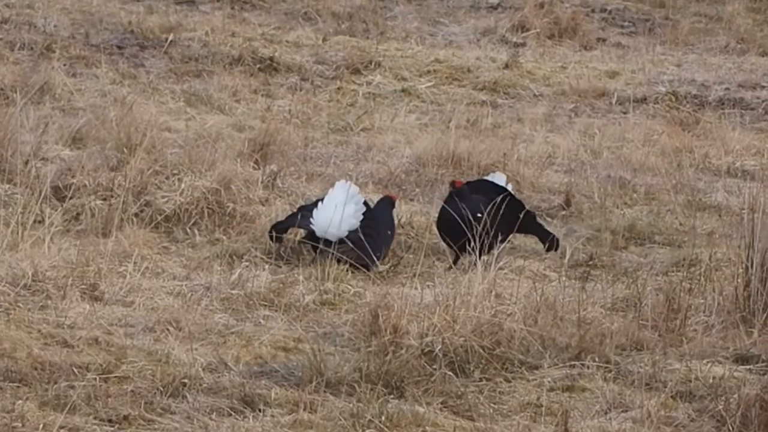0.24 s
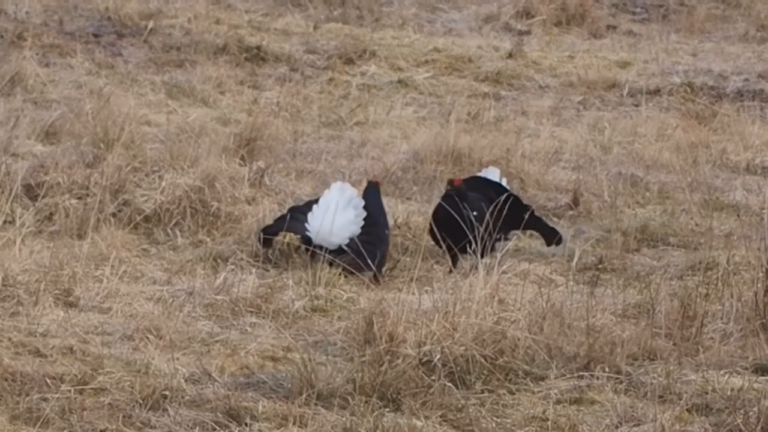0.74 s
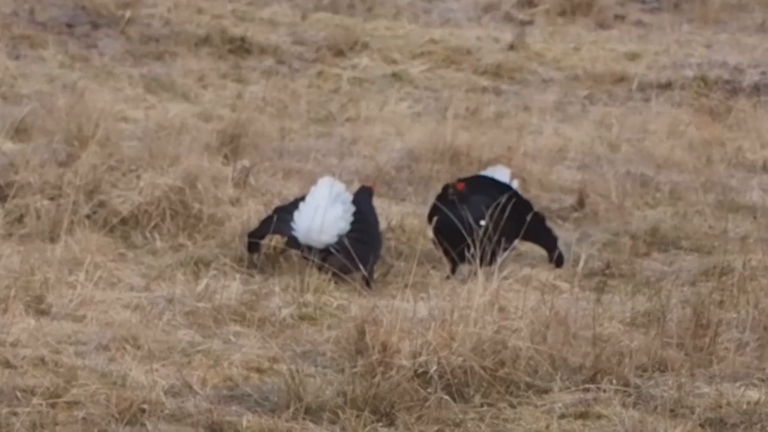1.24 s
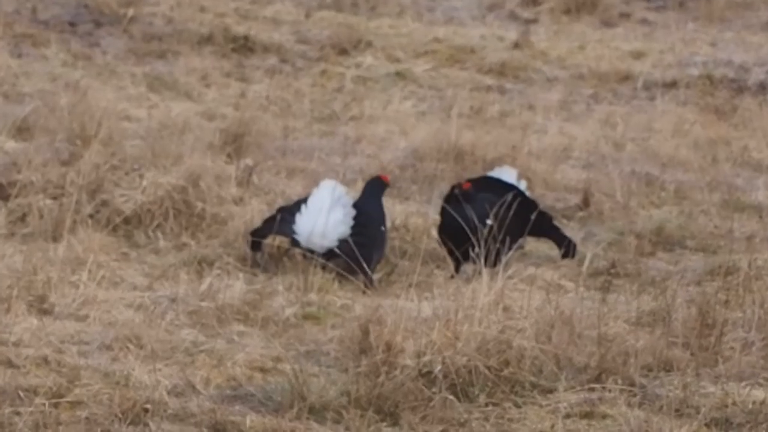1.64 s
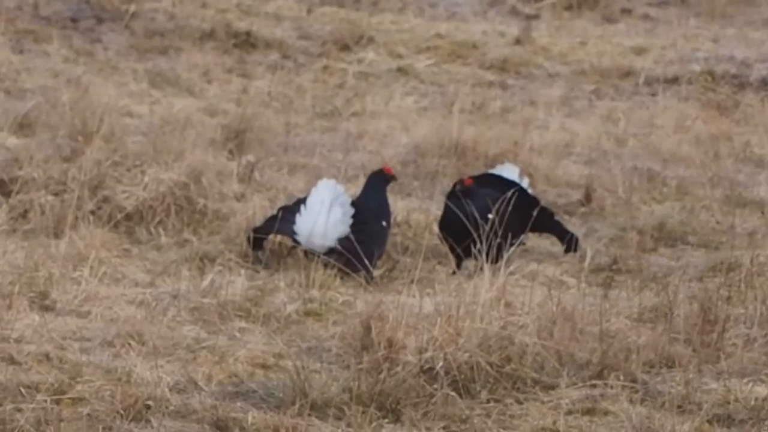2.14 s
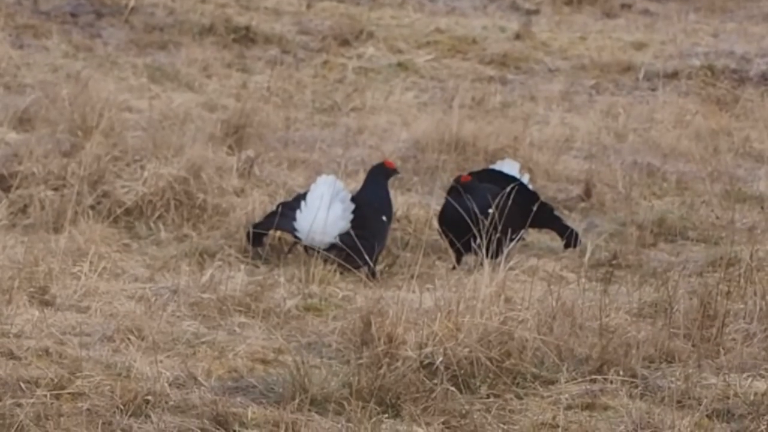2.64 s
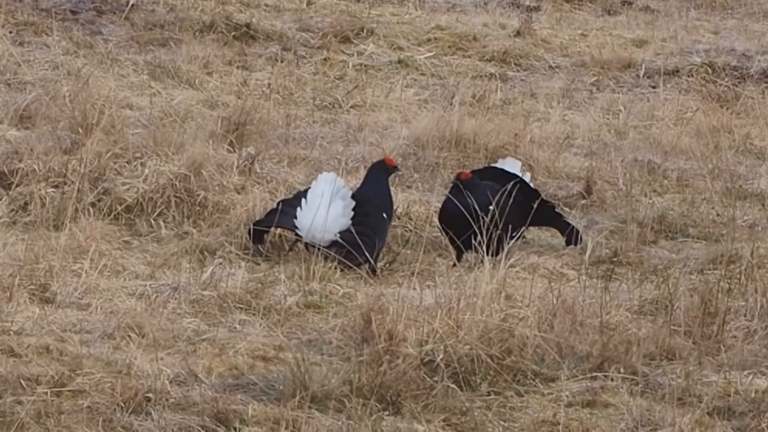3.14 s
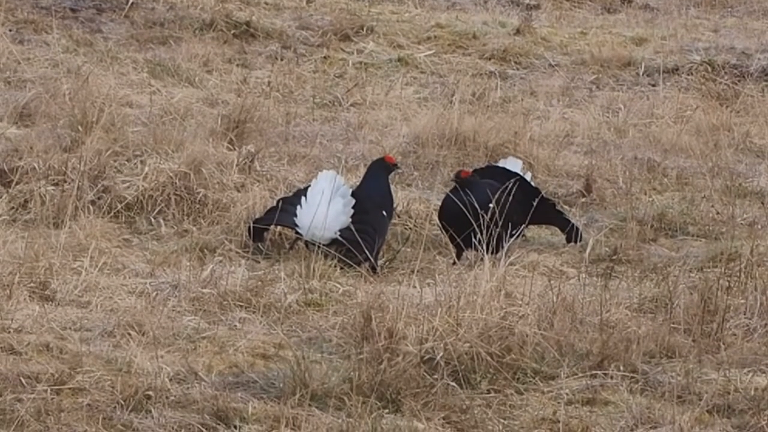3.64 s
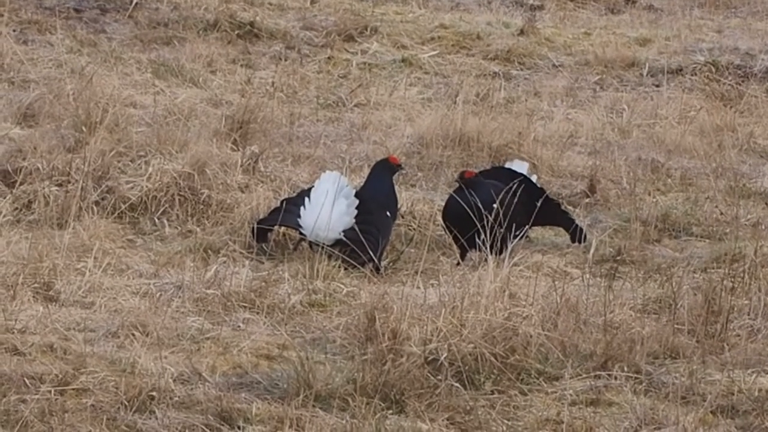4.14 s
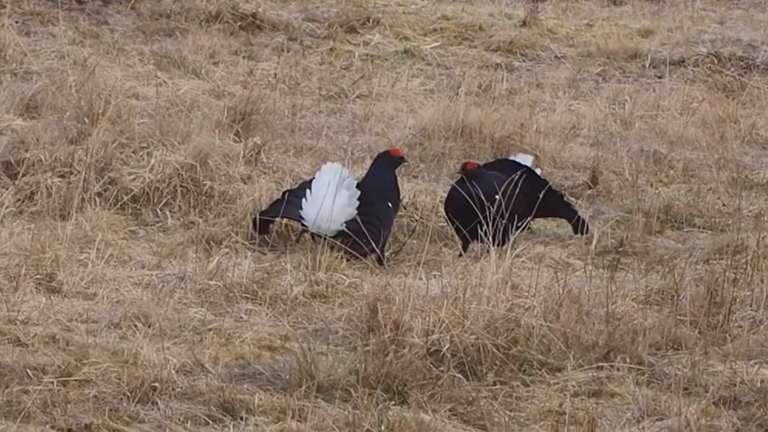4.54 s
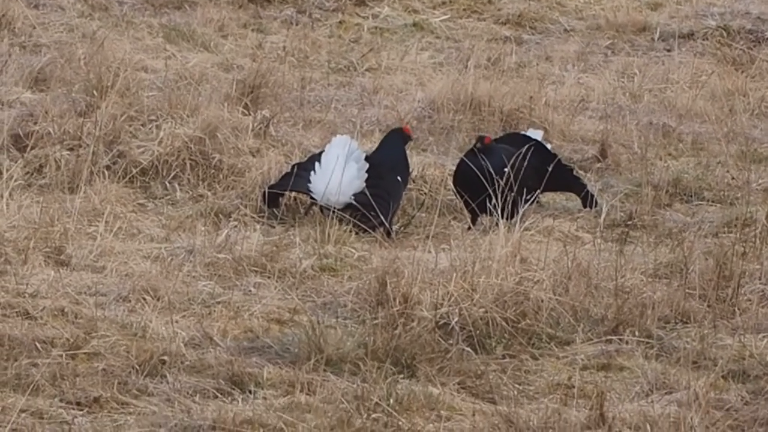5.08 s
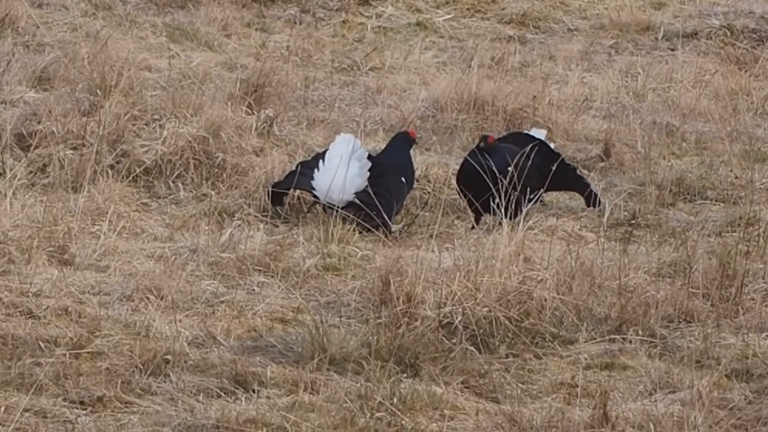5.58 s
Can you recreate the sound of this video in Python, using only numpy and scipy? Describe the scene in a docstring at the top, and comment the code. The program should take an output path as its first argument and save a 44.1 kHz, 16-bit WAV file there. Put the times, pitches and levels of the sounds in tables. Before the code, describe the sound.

Two black grouse bubble and coo low and liquid on an open moor, with an early hoarse cackle and light wind rumble.

```python
"""Black grouse display on an open moor

Males bubble and coo in light wind: each bubble is a ringing sine, each coo a gliding, nearly pure tone.
Behind them a distant chorus blends bands of noise around one pitch with many faint bubbles.
Early on, one male cackles: rows of partials shaped by a throat, with pulsing noise for the hiss.
Faint songbirds are short gliding sines; ticks in the grass are brief bursts of noise.
Two dull knocks near the microphone are dying low tones, each doubled and topped with a noisy snap."""
import sys
import numpy as np
from scipy import signal
from scipy.fft import rfft, irfft, next_fast_len
from scipy.io import wavfile

SR = 44100
rng = np.random.default_rng(int(sys.argv[2]) if len(sys.argv) > 2 else 0)


def file_out(sig):
    """Save sig as 16-bit WAV at sys.argv[1]."""
    # one column per channel
    cols = np.atleast_2d(sig).T
    # limit, then scale
    lim = np.clip(cols, -1, 1)
    pcm = np.round(lim * 32767).astype(np.int16)
    wavfile.write(sys.argv[1], SR, pcm)


N = 256220
TIME = np.arange(N) / SR  # seconds


def amp(db):
    """Turns decibels into gain."""
    return 10 ** (np.asarray(db) / 20)


def evened(x):
    """Scales a sound to an average (rms) strength of 1."""
    return x / np.sqrt(np.mean(x ** 2) + 1e-20)


def read(points, hz):
    """Reads a curve of (Hz, value) points, with frequency on a log axis as in hearing."""
    f, value = np.transpose(points)
    return np.interp(np.log(hz + 1), np.log(f + 1), value)


def level(rows):
    """Turns (s, dB) points into a gain at every sample."""
    return amp(np.interp(TIME, *np.transpose(rows)))


def colour(x, points):
    """Filters a sound by making each frequency louder or softer, from (Hz, dB) points."""
    n = x.shape[-1]
    size = next_fast_len(n + 4096)
    gain = amp(read(points, np.fft.rfftfreq(size, 1 / SR)))
    return irfft(rfft(x, size) * gain, size)[..., :n]


def noise(points, size=N):
    """Makes noise of rms 1 with a chosen balance of frequencies."""
    return evened(colour(rng.standard_normal(size), points))


def band(hz, width_hz, size=N):
    """Makes noise in one bell-shaped band; around zero Hz it is a slow random drift."""
    full = next_fast_len(max(size, SR // 4))
    f = np.fft.rfftfreq(full, 1 / SR)
    spectrum = rng.standard_normal((len(f), 2)) @ [1, 1j]
    bell = np.exp(-.5 * ((f - hz) / width_hz) ** 2)
    return evened(irfft(spectrum * bell, full))[:size]


def add(mix, s, sound):
    """Mixes a sound in at time s, cutting off what falls outside."""
    start = round(s * SR)
    sound = sound[max(-start, 0):]
    part = mix[max(start, 0):][:len(sound)]
    part += sound[:len(part)]


def scatter(x, t60):
    """Faint echoes from tussocks and slopes: random taps that fade by 60 dB in t60 seconds."""
    t = np.arange(SR // 2) / SR
    taps = rng.standard_normal(len(t)) * amp(-60 * t / t60) * (t > .012)
    return signal.fftconvolve(x, taps / np.linalg.norm(taps))[:N]


def near_centre(x, lag_s):
    """Places a sound just left of centre: it reaches the right ear a little later."""
    return np.array([x, np.interp(TIME - lag_s, TIME, x)])


def off_left(x):
    """Places a sound to the left: the far ear hears it with changed tone and phase."""
    # gain at the far ear: f/Hz, level/dB
    shade = [(300, 2.5), (1200, -2), (2400, -5), (4500, -5.5), (8000, -5), (15000, -3)]
    # phase between the ears: f/Hz, phase/radians
    turn = [(1100, 0), (1400, 1.5), (3300, 1), (4800, 4), (6000, 4.5), (8000, 4.5)]
    hz = np.fft.rfftfreq(N, 1 / SR)
    far = irfft(rfft(x) * amp(read(shade, hz)) * np.exp(1j * read(turn, hz)), N)
    return np.array([x, far])


def note(start, end, db, pitch_hz, fall_hz, arch_hz, swell_db, edge, jitter, jitter_hz, steep_ends=0):
    """Gives loudness and phase of a syllable whose pitch falls and arches; edge is its fade in seconds."""
    u = np.linspace(0, 1, max(round((end - start) * SR), 64))
    # steep_ends flattens the middle of the glide and steepens both ends
    along = u - .5 + steep_ends * u * (u - .5) * (u - 1)
    arch = -(2 * along) ** 2
    hz = pitch_hz - fall_hz * along + arch_hz * (arch - arch.mean())
    hz = hz * (1 + jitter * band(0, jitter_hz, len(u)))
    fades = signal.windows.tukey(len(u), 2 * edge * SR / len(u))
    envelope = amp(db + swell_db * (u - .5)) * fades
    return envelope, 2 * np.pi * np.cumsum(hz) / SR


def moor():
    """Wind buffeting the microphone as deep noise, a low far hum, and the even hiss of open air."""
    # wind strength before the ear gains: t/s, level/dB
    wind_db = [(0.0, -26.5), (0.24, -24), (1.23, -31.5), (2.36, -26), (3.45, -30.5), (3.74, -29),
               (5.81, -30)]
    # tone of the wind: f/Hz, level/dB
    wind_colour = [(3, 3.5), (10, -1), (20, -6.5), (32, -9), (50, -20), (100, -31), (200, -33.5),
                   (500, -70)]
    # hum strength before the ear gains: t/s, level/dB
    hum_db = [(0, -47), (1.0, -41), (1.5, -49.5), (2.4, -42), (3.4, -52), (4.6, -48.5), (4.9, -37),
              (5.3, -47.5), (5.81, -46)]
    # relative tone of the air hiss: f/Hz, level/dB
    air_colour = [(40, -3), (110, 13.5), (280, 17.5), (700, 12.5), (1300, 3.5), (2200, 1), (4300, 0),
                  (6500, -4), (10000, -6.5), (16000, -8)]
    # how alike the hiss is in the two ears: f/Hz, likeness (1 = the same)
    likeness = [(50, 0.51), (500, 0.92), (1300, 0.077), (3000, 0.043), (8000, 0.09), (16000, 0.27)]

    gust = noise(wind_colour)  # shared by both ears
    ears = np.array([evened(gust + .5 * noise(wind_colour)) for _ in range(2)])
    wind = ears * level(wind_db) * amp([[2.5], [0]])
    hum = band(78.7, 6) * level(hum_db) * amp([[-1], [-2]])

    shared, own = rng.standard_normal((2, N))
    same = np.clip(read(likeness, np.fft.rfftfreq(N, 1 / SR)), -1, 1)
    right = irfft(same * rfft(shared) + np.sqrt(1 - same ** 2) * rfft(own), N)
    air = evened(colour(np.array([shared, right]), air_colour))
    return wind + hum + amp(-48.5) * air


def mount():
    """The microphone's mount trembles in the breeze, moving the ears in opposite directions."""
    # resonances of the mount: f/Hz, width/Hz, level/dB
    modes = [(138, 14, -47.5), (185.5, 16, -41.5)]
    tremble = sum(amp(db) * band(hz, width_hz) for hz, width_hz, db in modes)
    return tremble * np.array([[1], [-1]])


def bubble(db, hz, decay, rise=0.00587, sag=0.12, settle=0.012):
    """A short push on the throat sac: it swells in a few cycles, then rings away as its pitch relaxes upward."""
    t = np.arange(-rise, .09, 1 / SR)  # zero at the peak
    swell = np.cos(np.pi / 2 * t / rise) ** 2
    ring = np.exp(-(np.hypot(t, decay / 2) - decay / 2) / decay)  # rounded at the top
    envelope = np.where(t < 0, swell, ring)
    pitch = hz * (1 + sag * np.tanh(t / settle) / 2)
    cycles = np.cumsum(pitch) / SR + rng.random()
    return np.sqrt(2) * amp(db) * envelope * np.sin(2 * np.pi * cycles), rise


def chorus(murmur_db=-3, bubbles_db=-9):
    """Far males: a blurred murmur, a band at their common pitch, and many faint bubbles."""
    # relative tone of the murmur: f/Hz, level/dB
    murmur_colour = [(200, -15.5), (310, -12), (385, -4), (430, 5), (510, -10), (660, -5), (770, -11.5),
                     (850, -10.5), (1000, -27), (1500, -60)]
    # strength of the chorus before its parts' own gains: t/s, level/dB
    chorus_db = [(0, -36), (2.3, -38), (2.7, -37), (4.5, -37.5), (5.81, -40.5)]
    bubbles = np.zeros(N)
    for when, size, pitch in rng.random((round(120 * N / SR), 3)):  # 120 a second
        sound, _ = bubble(-10 * size - 10 * pitch, 410 + 280 * pitch ** 4, .012)
        add(bubbles, when * N / SR, sound)
    murmur = noise(murmur_colour) * amp(2.0 * band(0, 24))
    common_pitch = band(434.3, 11.5)
    mix = amp(murmur_db) * murmur + amp(-12) * common_pitch + amp(bubbles_db) * evened(bubbles)
    return level(chorus_db) * mix


def bubbling():
    """Quick runs of bubbles on an even beat; the force of each push sets its pitch and its ring."""
    # runs: t/s of the first peak, number of bubbles, level/dB of the first
    runs = [(.010, 2, -21.5), (0.103, 1, -29), (.168, 1, -20.5), (.219, 1, -27), (.288, 3, -19),
            (.426, 1, -26), (.489, 1, -20.5), (.546, 1, -23), (.646, 1, -22.5), (.734, 1, -31),
            (.805, 1, -23), (.906, 1, -21), (.986, 1, -25), (1.124, 2, -26), (1.375, 3, -28.5),
            (1.574, 2, -28), (1.696, 1, -28), (1.855, 3, -29), (2.016, 1, -31), (2.136, 4, -28.5),
            (2.407, 1, -21.5), (2.875, 1, -26), (3.055, 4, -27), (3.532, 1, -23), (3.656, 1, -28),
            (3.735, 2, -28), (3.815, 1, -22), (3.977, 1, -22), (4.052, 1, -26.5), (4.310, 1, -18.5),
            (4.792, 1, -27), (4.915, 1, -33.5)]
    # pitch of the sac at the usual force; it tightens for the coos: t/s, f/Hz
    sac_pitch = [(0, 416.6), (2.8, 422.3), (3.2, 436), (3.55, 460), (3.8, 421), (4.25, 534), (5.0, 477)]
    gap_s = .040  # beat within a run
    usual_db, carry = -29.5, 0.59  # a run settles to the usual level; each bubble hands on this share
    ring_s, run_ring_s = 0.0057, 0.008  # decay at usual force: first bubble, those that follow
    hard_hz_per_db, hard_halves_db = 2.5, 31  # a harder push sounds lower and dies sooner
    out = np.zeros(N)
    for start, count, first_db in runs:
        for k in range(round(count)):
            s = start + k * gap_s
            force_db = (first_db - usual_db) * carry ** k
            hz = np.interp(s, *np.transpose(sac_pitch)) - hard_hz_per_db * force_db
            decay = (run_ring_s if k else ring_s) * .5 ** (force_db / hard_halves_db)
            sound, lead = bubble(usual_db + force_db, hz, decay)
            add(out, s - lead, sound)
    return out


def yelp(row, rough, lean=0.88, muffle=1.0, sharpen_db=10, drift_db=2):
    """One cackle note: partials through the throat, growing sharper as the note closes."""
    # resonances of the throat: f/Hz, level/dB
    throat = [(300, -37), (520, -4.5), (1000, -1.5), (1550, 2), (2100, -8.5), (2650, -14), (3300, -34),
              (4400, -30), (5300, -16.5), (7000, -50)]
    envelope, phase = note(*row, swell_db=0.5, edge=.006, jitter=.014, jitter_hz=200, steep_ends=1.4)
    hz = np.gradient(phase) * SR / (2 * np.pi)
    closing = np.linspace(-1, 1, len(hz)) ** 3
    gentle_db = -24 - 20 * np.log10(envelope.max())  # below zero for a forceful note
    tone = 0
    for k in range(1, 14):
        db = read(throat, k * hz) + drift_db * band(0, 34, len(hz))
        db = db + sharpen_db * closing * np.clip(k / 4 - 1, 0, 1)
        # a gentle note leans on its fundamental, and the half-closed bill muffles its upper partials
        muffled = muffle * np.clip((k * hz - 1550) / 350, 0, 1)
        db = db + gentle_db * (lean * (k == 1) - muffled)
        tone = tone + amp(db) * np.cos(k * phase + 2 * np.pi * rng.random())
    rough = np.clip(rough, 0, 1)
    voice = (1 - rough) * evened(tone) + rough * noise(throat, len(phase))
    return envelope * evened(voice), phase


def cackle(rasp=0.96, voice_db=1.5, hiss_db=4):
    """A run of yelps, with air hissing through the open bill in rasping puffs that pulse with the voice."""
    # notes before the voice gain: start t/s, end t/s, level/dB, f/Hz, fall/Hz, arch/Hz, roughness (0-1)
    yelps = [(0.581, 0.644, -35.5, 523, 46, 203, 0.2), (0.764, 0.819, -33, 552, 202, -4, 0.17),
             (0.937, 0.978, -25.5, 530, 95, 68, 0), (.979, 1.018, -32, 483, -61.5, -45, 0.16),
             (1.011, 1.049, -24, 521, 68, 40, 0.1), (1.057, 1.089, -22.5, 522, 16, 25, 0.1),
             (1.114, 1.149, -21, 516.6, 75, 28, 0), (1.163, 1.194, -22, 508, 92, 30, .04),
             (1.213, 1.24, -30.5, 456, 35, 14, .08), (1.271, 1.304, -34.5, 452, 64, 14, 0.25),
             (1.313, 1.332, -37, 481, 13, 20, 1), (1.352, 1.392, -43, 372, 78, 0, 0.65)]
    # steady hiss, swelling with the cackle, before the hiss gain: t/s, level/dB
    hiss_level = [(0, -55), (.55, -58.5), (.9, -58.5), (.97, -37.5), (1.02, -47.5), (1.07, -34),
                  (1.18, -42), (1.28, -55), (1.36, -49), (1.45, -70), (1.7, -85)]
    # relative tone of the hiss: f/Hz, level/dB
    hiss_colour = [(500, -4), (1300, -9.5), (2150, 0.5), (2750, -5), (3450, 1), (4450, -3.5), (5250, 2.5),
                   (6000, -1.5), (6850, -14), (7600, -9), (9500, -19.5), (16000, -28)]
    # separate puffs before the hiss gain: t/s, level/dB, half length/s
    lone_puffs = [(0.598, -50.5, .018), (.775, -49, 0.014), (0.985, -35, 0.0037), (1.255, -41, 0.0085),
                  (1.324, -34.5, 0.013)]
    # each note closes on a puff, set against a full note
    full_db, closing_db, growth = -22, -16, 1.64  # growth: dB of puff per dB of note
    lead_s, half_length_s = .007, 0.008  # time before the note's end, half length of the puff

    voice, pulsing = np.zeros(N), np.zeros(N)
    for *row, rough in yelps:
        sound, phase = yelp(row, rough)
        add(voice, row[0], sound)
        add(pulsing, row[0], np.cos(phase))

    closings = [(end - lead_s, full_db + closing_db + growth * (db - full_db), half_length_s)
                for _, end, db, *_ in yelps]
    puffs = sum(amp(db) * np.exp(-.5 * ((TIME - s) / length) ** 2)
                for s, db, length in closings + lone_puffs)
    air = np.hypot(level(hiss_level), puffs * amp(2.0 * band(0, 200)))
    rasping = rng.standard_normal(N) * (1 + rasp * pulsing)
    hiss = air * evened(colour(rasping, hiss_colour))
    return off_left(amp(voice_db) * voice + amp(hiss_db) * hiss)


def cascade(start, count, db, first_hz, last_hz):
    """Lists the whistles of one cascade: short, steep falling notes, each lower and softer than the last."""
    gap_s, note_s, fade_db = 0.015, 0.012, 1.3  # beat, note length, fade per note
    sweep = 0.082  # glide each way, as a share of the pitch
    return [(start + k * gap_s, note_s, db - k * fade_db, hz * (1 + sweep), hz * (1 - sweep))
            for k, hz in enumerate(np.linspace(first_hz, last_hz, round(count)))]


def songbirds(warble=0.015, count=5):
    """Thin whistles from far across the moor: gliding sines, unsteady in pitch and loudness."""
    # single whistles, level before the far mix: t/s, length/s, level/dB, first f/Hz, last f/Hz
    chirps = [(2.441, 0.013, -57, 3140, 2740), (3.097, 0.042, -64, 2950, 3550),
              (4.413, 0.079, -62, 3980, 5800), (4.561, 0.076, -62, 3236, 3190),
              (5.005, 0.061, -57, 2850, 3430), (5.086, .03, -53, 4100, 4450),
              (5.154, 0.062, -58, 3570, 3590), (5.269, 0.054, -57, 2590, 3450),
              (5.685, 0.079, -59, 4170, 3980), (5.743, .085, -61, 3150, 2600)]
    # cascades, level before the far mix: t/s, number of notes, level/dB, first f/Hz, last f/Hz
    cascades = [(2.36, 2, -48.5, 5020, 4170), (2.433, 7, -50.5, 4750, 2600)]
    # one bird repeats a tiny falling blip, 64 samples long, every 0.151 s
    refrain = [(1.548 + k * .151, 64 / SR, -53, 3300, 2600) for k in range(count)]
    falling = [whistle for row in cascades for whistle in cascade(*row)]
    out = np.zeros(N)
    for s, length, db, first_hz, last_hz in chirps + refrain + falling:
        hz = np.geomspace(first_hz, last_hz, max(round(length * SR), 64))
        hz = hz * (1 + warble * band(0, 110, len(hz)))
        envelope = amp(db + 5.1 * band(0, 46, len(hz))) * signal.windows.tukey(len(hz), .8)
        add(out, s, np.sqrt(2) * envelope * np.sin(2 * np.pi * np.cumsum(hz) / SR))
    return off_left(out)


def grass_ticks(decay=0.0021):
    """Dry ticks in the grass: bands of noise that die away in a few milliseconds."""
    # ticks: t/s, level/dB at the start, centre f/Hz
    ticks = [(2.274, -45, 7700), (4.720, -45, 2880), (5.079, -37.5, 2530)]
    out, t = np.zeros(N), np.arange(SR // 8) / SR
    for s, db, hz in ticks:
        add(out, s, amp(db) * band(hz, .16 * hz, len(t)) * np.exp(-t / decay))
    return out


def long_note(length):
    """Goes from 0 for a short coo to 1 for one long enough to arch fully; halfway at 0.0525 s."""
    return (1 + np.tanh((length - 0.0525) / 0.012)) / 2


def cooing(flutter=0.23, overtone_db=-41):
    """Longer, almost pure notes that glide through the resonance of the sac."""
    # coos, level before the resonance: start t/s, end t/s, level/dB, f/Hz, fall in pitch/Hz
    coos = [(3.298, 3.346, -29, 432, 65), (3.367, 3.428, -27.5, 442, 64), (3.427, 3.459, -29.5, 474, 75),
            (3.455, 3.487, -27, 464, 0), (3.491, 3.541, -26.5, 502, 77), (3.868, 3.924, -22, 499, 36),
            (3.929, 3.977, -24, 532, 35), (3.993, 4.047, -30, 537, 26), (4.067, 4.137, -28, 534, 115),
            (4.276, 4.333, -25.5, 498, -62), (4.341, 4.408, -24, 540, 44), (4.412, 4.491, -26, 516.6, 112),
            (4.649, 4.706, -21.5, 521, -17), (4.709, 4.776, -23.5, 508, 13), (4.8, 4.828, -28, 465, 8),
            (4.983, 5.027, -22, 524, 133), (5.061, 5.105, -26.5, 467, 8), (5.107, 5.135, -29, 480, 10)]
    full_db, arch_doubles_db = -24.5, 10  # a louder coo arches more
    full_arch_hz = 44  # arch of a long coo at full_db
    sac_hz, sac_width_hz = 500, 100  # a coo is fullest as its pitch crosses the sac's resonance
    out = np.zeros(N)
    for start, end, db, pitch_hz, fall_hz in coos:
        arch_hz = full_arch_hz * long_note(end - start) * 2 ** ((db - full_db) / arch_doubles_db)
        envelope, phase = note(start, end, db, pitch_hz, fall_hz, arch_hz, swell_db=3,
                               edge=0.0068, jitter=0.012, jitter_hz=60)
        hz = np.gradient(phase) * SR / (2 * np.pi)
        resonance = 1 / np.hypot(1, (hz - sac_hz) / sac_width_hz)
        envelope = envelope * (1 + flutter * band(0, 37, len(phase))) * resonance
        tone = np.sin(phase) + amp(overtone_db) * np.sin(2 * phase)
        add(out, start, np.sqrt(2) * envelope * tone)
    return out


def knocks(snap_decay=0.0055):
    """Dull knocks: a low push under a short snap, rocking the two ears against each other."""
    # pushes: t/s, level/dB, f/Hz, decay/s, snap level/dB, rocking of the mount (share of the push)
    pushes = [(4.2476, -17.5, 170, 0.0059, -27, .1), (4.262, -15.5, 121, 0.0047, -36, .1),
              (5.077, -21, 190, 0.012, -50, 1.5), (5.115, -26.5, 170, 0.012, -65, 1.9)]
    # relative tone of the snap: f/Hz, level/dB
    snap_colour = [(100, -2), (550, -6), (900, 9.5), (1250, -4.5), (1800, -21), (2700, -12.5), (3500, -29),
                   (5000, -28), (16000, -60)]
    out, rock, t = np.zeros(N), np.zeros(N), np.arange(SR // 8) / SR
    for s, db, hz, decay, snap_db, rocking in pushes:
        push = np.sqrt(2) * amp(db) * np.exp(2j * np.pi * hz * t - t / decay)
        snap = amp(snap_db) * noise(snap_colour, len(t)) * np.exp(-t / snap_decay)
        add(out, s, push.imag + snap)
        add(rock, s, rocking * push.real * np.tanh(t * hz))  # tanh softens the start
    return np.array([out + rock, out - rock])


def scene():
    """The song stands just left of centre; the cackle and the songbirds are further left."""
    bubbles, coos, harsh, birds = bubbling(), cooing(), cackle(), songbirds()
    bubbles = near_centre(bubbles + amp(-14.5) * scatter(bubbles, t60=0.49) + chorus(), lag_s=2e-5)
    coos = near_centre(coos + amp(-14) * scatter(coos, t60=0.27), lag_s=5e-5)
    harsh = harsh + amp(-21.0) * np.array([scatter(side, t60=0.38) for side in harsh])
    birds = amp(2.5) * birds + amp(-8.5) * np.array([scatter(side, t60=0.23) for side in birds])
    return moor() + mount() + bubbles + harsh + birds + grass_ticks() + coos + knocks()


def record(dry):
    """The recorder's band limit: a low-pass filter at 15850 Hz."""
    low_pass = signal.firwin(511, 15850, window=("kaiser", 9), fs=SR)
    return signal.oaconvolve(dry, low_pass[None], "same")


dry = scene()
out = record(dry)
file_out(out)
```